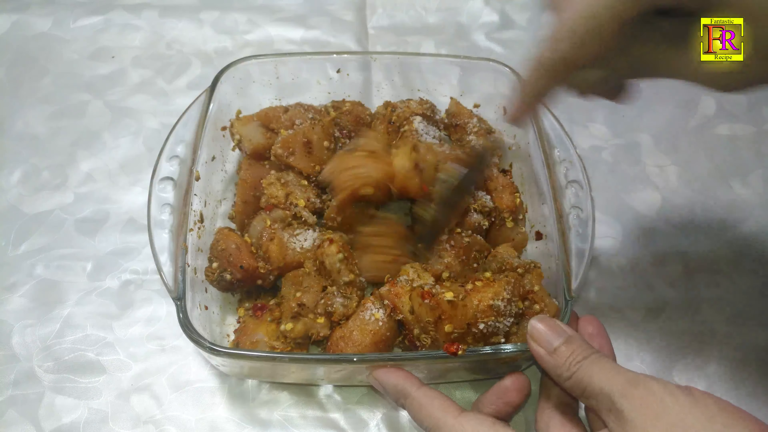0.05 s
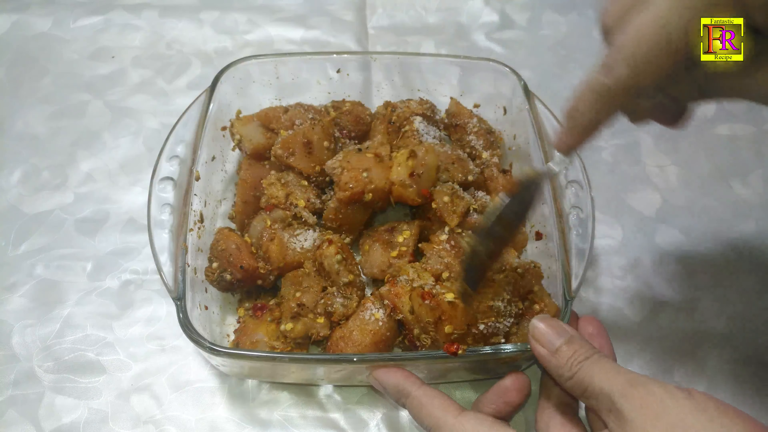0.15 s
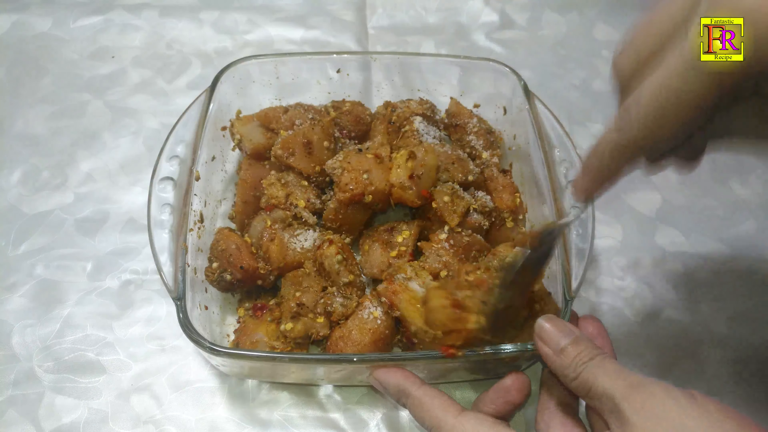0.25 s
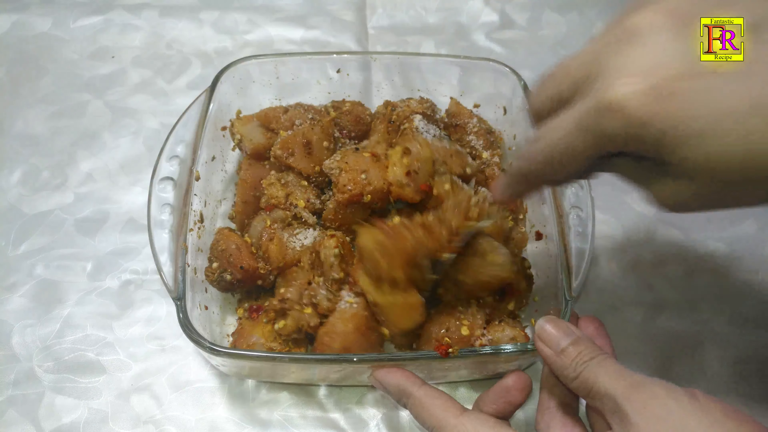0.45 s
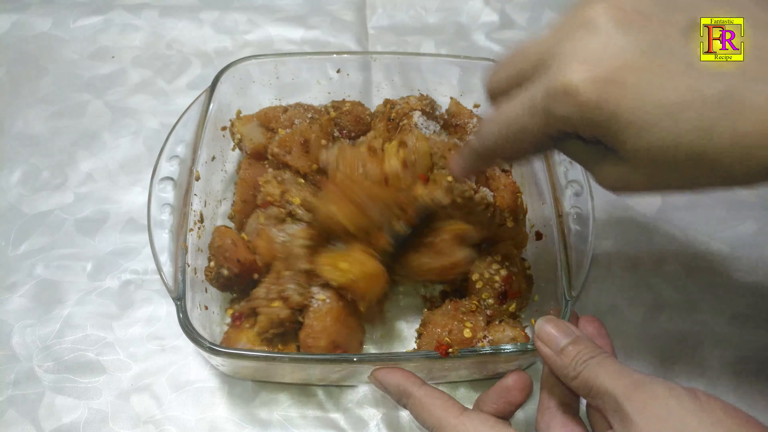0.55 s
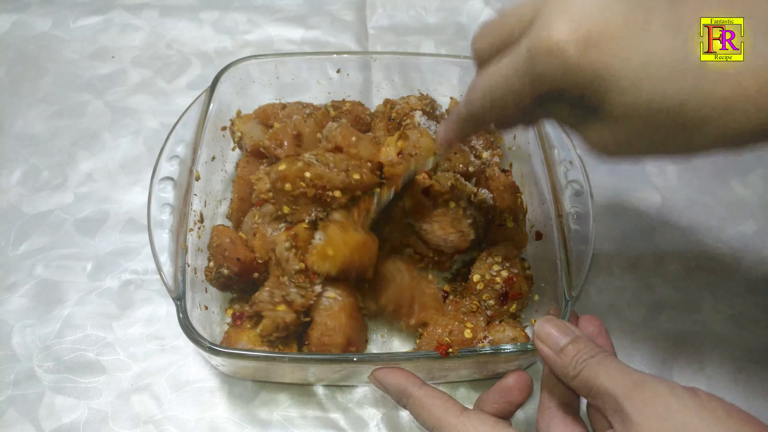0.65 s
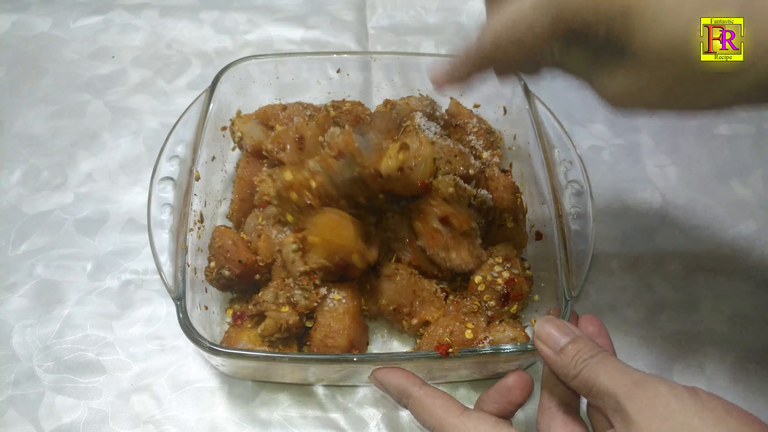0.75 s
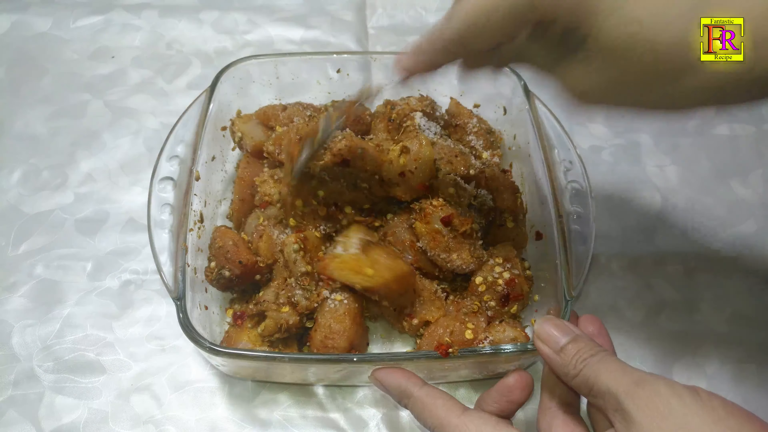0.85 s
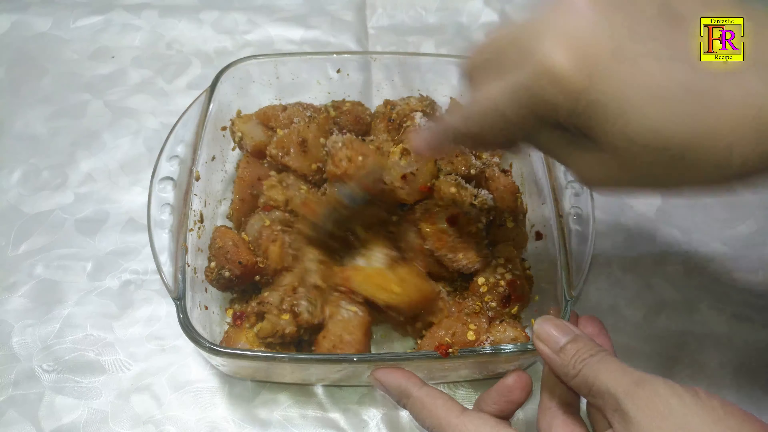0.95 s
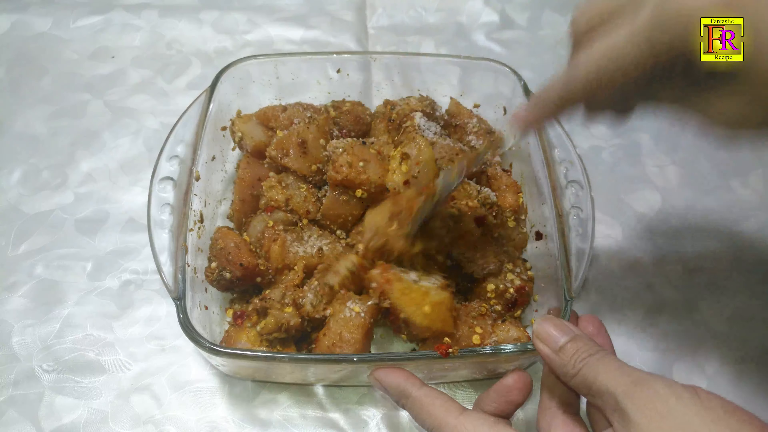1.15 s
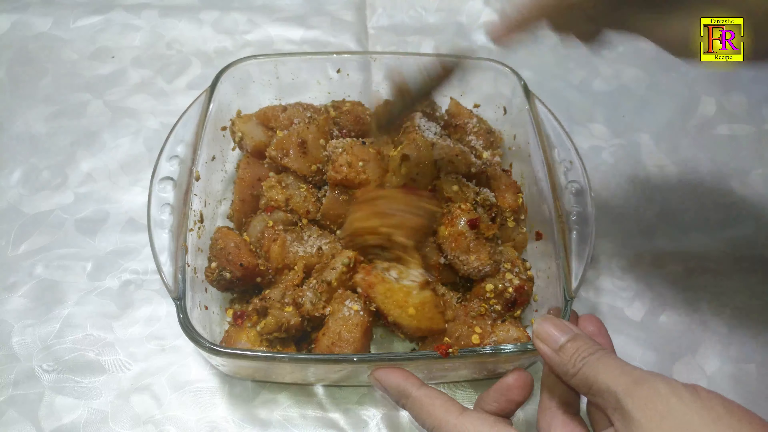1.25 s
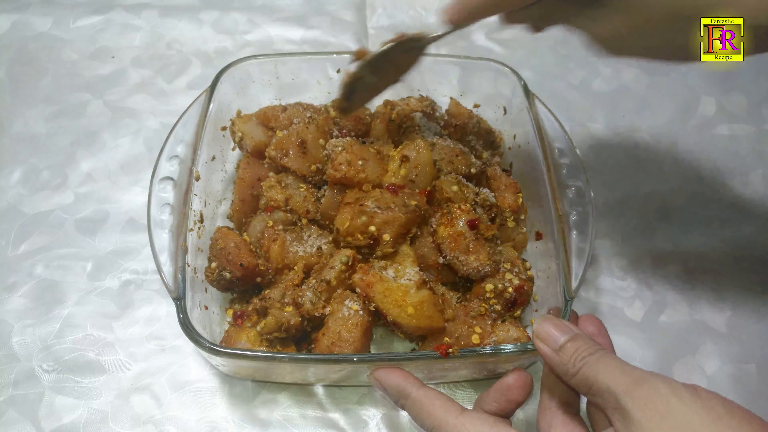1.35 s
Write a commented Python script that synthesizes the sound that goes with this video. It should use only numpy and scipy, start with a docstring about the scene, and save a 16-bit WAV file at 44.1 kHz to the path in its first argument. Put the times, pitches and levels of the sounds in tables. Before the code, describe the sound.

A metal spoon clinks on a glass baking dish: an earlier clink's tail fades at the start, then one loud, bright, rapidly chattering hit at 0.2 seconds, with short kitchen reverberation. The dish faintly rubs and groans on the counter near 0.7 and 1.2-1.4, with a tiny spoon tick around 0.9. An insect outside chirps about seven times a second over quiet room air and low hum. Close stereo microphone.

```python
"""A hard-walled kitchen: a metal spoon clinks once on a glass baking dish while an earlier clink dies away.
Each clink is a chatter of contacts, every one ringing damped modes and snapping with a burst of noise.
The dish grumbles on the counter as random slips shake resonances, with sine groans and light spoon ticks.
Outside, an insect chirps in gliding pulses and rasping noise; shaped noise makes the room air and a low hum.
A two-port microphone hears the clinks left first, the sliding dish and the insect right first."""
import sys
import numpy as np
from scipy import signal
from scipy.fft import rfft, irfft, next_fast_len
from scipy.io import wavfile
from scipy.ndimage import uniform_filter1d, map_coordinates

SR = 44100
rng = np.random.default_rng(int(sys.argv[2]) if len(sys.argv) > 2 else 0)


def generate_wav(sig):
    """Save sig (samples, or channels by samples) to the path in sys.argv[1] as 16-bit PCM at SR."""
    pcm = np.round(np.clip(np.atleast_2d(sig).T, -1, 1) * 32767).astype(np.int16)
    wavfile.write(sys.argv[1], SR, pcm)


def boost(x):
    """Linear amplitude factor 10**(x/20) for a level x in decibels (scalar or array-like)."""
    u = np.asarray(x, float) / 20
    return 10 ** u


N = 61739
PAD = SR // 2  # samples kept before and after the take, so the earlier clink can ring in
LEFT_LAG_S = 0.00019  # the left port hears the insect, the sliding dish and the air this much later


def filtered(x, response):
    """Multiplies the spectrum of x by a complex response of frequency."""
    size = next_fast_len(x.shape[-1] + SR // 4)
    hz = np.fft.rfftfreq(size, 1 / SR)
    return irfft(rfft(x, size) * response(hz), size)[..., :x.shape[-1]]


def unit(x):
    """Scales a signal to rms 1."""
    return x / np.sqrt(np.mean(x ** 2) + 1e-30)


def along(points, hz):
    """Reads a curve of (frequency [Hz], value) points on a log frequency axis."""
    point_hz, value = np.transpose(points)
    return np.interp(np.log(hz + 1), np.log(point_hz + 1), value)


def curve(rows):
    """Joins (time [s], value) rows by straight lines, one value per sample."""
    return np.interp(np.arange(N) / SR, *np.transpose(rows))


def wobble(rate):
    """A smooth random curve with rate knots a second."""
    return map_coordinates(rng.standard_normal(200), [np.arange(N) * rate / SR])


def shaped_noise(shape, spectrum):
    """Noise of rms 1 coloured by (frequency [Hz], level [dB per Hz]) points."""
    noise = rng.standard_normal(shape)
    return unit(filtered(noise, lambda hz: boost(along(spectrum, hz))))


def spread(pair, alike):
    """Mixes two unrelated signals to a left-right likeness that varies with frequency."""
    def mid_side(hz):
        turn = np.arccos(np.clip(along(alike, hz), -1, 1)) / 2
        return np.array([np.cos(turn), np.sin(turn)])

    mid, side = filtered(pair, mid_side)
    return np.array([mid + side, mid - side])


def at_ports(x, lag_s=LEFT_LAG_S, balance=((1000, -1.5),)):
    """A source off to one side reaches the ports at unequal times and levels (left over right, dB)."""
    def half(hz):
        return boost(along(balance, hz) / 2) * np.exp(-1j * np.pi * hz * lag_s)

    return filtered(x, lambda hz: np.array([half(hz), 1 / half(hz)]))


def ring(modes, t):
    """Sums damped modes of alternating sign, with slightly new strengths at each blow."""
    out = 0
    for k, (hz, db, t60) in enumerate(modes):
        decay = boost(db + rng.normal(0, 1) - 60 * t / t60)
        out = out + (-1) ** k * decay * np.sin(2 * np.pi * hz * t)
    return out


def room(x):
    """Kitchen walls answer with decaying noise; the rooms beyond answer longer and duller."""
    # kitchen reverberation: (frequency [Hz], decay by 60 dB [s])
    kitchen = [(150, 1), (500, 0.2994), (1500, 0.41), (4000, 0.36), (8000, 0.42), (14000, 0.3)]
    # likeness of the tail at the two ports: (frequency [Hz], correlation [-1 to 1])
    tail_alike = [(100, 0.46), (300, .8), (700, .5), (1500, 0.13), (5000, 0.034)]
    delay_s = 0.0044  # silent this long, then fades in over as long again
    beyond_db, beyond_t60_s, beyond_top_hz = -32.5, 1.08, 2740
    hz, t, z = signal.stft(rng.standard_normal((2, SR)), SR, nperseg=256)
    decay = boost(-60 * t / along(kitchen, hz)[:, None])
    near = signal.istft(z * decay, SR, nperseg=256)[1][:, :SR]
    t = np.arange(SR) / SR
    near = near * np.clip(t / delay_s - 1, 0, 1)
    far = rng.standard_normal((2, SR)) * boost(-60 * t / beyond_t60_s) * np.clip(t / 0.021, 0, 1)
    far = filtered(far, lambda hz: 1 / (1 + (hz / beyond_top_hz) ** 4))
    tail = near / np.linalg.norm(near[0]) + boost(beyond_db) * far / np.linalg.norm(far[0])
    return signal.fftconvolve(x[None], spread(tail, tail_alike), axes=1)[:, :len(x)]


def air():
    """Room noise, patchy in time and frequency, over a narrow noise band that hums and wavers."""
    # colour of the room noise: (frequency [Hz], level [dB per Hz])
    air_colour = [(15, -46), (30, -30), (86, -9), (233, -13), (445, -14.5), (1170, -21), (3260, -22.5),
                  (4260, -32.5), (7100, -38.5), (9500, -46), (15500, -54.5)]
    # likeness of the room noise at the two ports: (frequency [Hz], correlation [-1 to 1])
    air_alike = [(60, 0.36), (300, 0.29), (1000, 0.2), (5000, 1)]
    air_db, hum_db = -73, -75.5
    hum_hz, hum_width_hz = 96, 17
    z = signal.stft(rng.standard_normal((2, N)), nperseg=512)[2]
    patches = uniform_filter1d(rng.standard_normal(z.shape[1:]), size=6, axis=0)
    patches = uniform_filter1d(patches, size=8, axis=1)
    pair = signal.istft(z * boost(2 * unit(patches)), nperseg=512)[1][:, :N]
    coloured = filtered(pair, lambda hz: boost(along(air_colour, hz)))
    hiss = unit(spread(coloured, air_alike))
    sides = np.array([[1], [-1]])  # left later, right earlier
    hiss = filtered(hiss, lambda hz: np.exp(-1j * np.pi * hz * LEFT_LAG_S * sides))
    hum = filtered(rng.standard_normal(N), lambda hz: 1 / (1 + ((hz - hum_hz) / hum_width_hz) ** 2))
    return boost(air_db + 0.83 * wobble(12)) * hiss + boost(hum_db) * unit(hum)


def insect():
    """Each chirp is two falling wing pulses and a dying rasp, smeared by walls, over a far chorus."""
    # chirps heard outside, the faint one at 1.271 s perhaps from another insect: (time [s], level [dB])
    chirps = [(0.048, -60), (0.192, -59.5), (0.359, -60.5), (0.5053, -62.5), (0.6473, -62), (0.7874, -63),
              (0.926, -58), (1.067, -58.5), (1.209, -62.5), (1.271, -68), (1.3483, -60)]
    # colour of the rasp after the pulses: (frequency [Hz], level [dB per Hz])
    rasp_colour = [(4300, -39), (4800, -17.5), (5200, -4.5), (5900, 4), (6300, -4.5), (7000, -16.5),
                   (9300, -26), (10000, -47.5)]
    # colour of the far insects: (frequency [Hz], level [dB per Hz])
    chorus_colour = [(2530, -58), (4300, -26.5), (4700, -22), (4960, -7.5), (5210, -4.5), (5850, -3),
                     (6090, -7), (7000, -19.5), (9500, -25.5), (12400, -66), (20900, -120)]
    pulse_s, glide_from_hz, glide_to_hz = .01, 6200, 4898
    lead_s, lead_db = .0238, 0.5  # the first pulse comes this much ahead of the second
    rasp_db, rasp_rise_s, rasp_t60_s = -4, 0.009, .35
    walls_t60_s, chorus_db = 0.42, -79.5

    u = np.arange(round(pulse_s * SR)) / (pulse_s * SR)
    glide_hz = glide_from_hz + (glide_to_hz - glide_from_hz) * u
    pulse = np.sin(np.pi * u) * (0.14 + u) * np.sin(2 * np.pi * np.cumsum(glide_hz) / SR)
    t = np.arange(SR // 4) / SR
    rasp_shape = boost(-60 * t / rasp_t60_s) * (1 - np.exp(-t / rasp_rise_s))
    pulses, rasp_level = np.zeros(N + SR), np.zeros(N + SR)
    for s, db in chirps:
        for at, pulse_db in ((s - lead_s, lead_db), (s, 0)):
            start = round((at - pulse_s / 2) * SR)
            pulses[start:][:len(u)] += boost(db + pulse_db + rng.normal(0, 1)) * pulse
        rasp_level[round(s * SR):][:len(t)] += boost(db + rasp_db) * rasp_shape

    t = np.arange(SR // 2) / SR
    walls = rng.standard_normal((2, len(t))) * boost(-60 * t / walls_t60_s) * np.clip(t / 0.0087, 0, 1)
    echo = signal.fftconvolve(pulses[None], walls / np.linalg.norm(walls[0]), axes=1)[:, :N]
    rasp_level = rasp_level[:N]
    rasp = shaped_noise((3, N), rasp_colour)  # one direct, two diffuse
    chorus = shaped_noise((3, N), chorus_colour)[1:]
    direct = at_ports(pulses[:N] + rasp_level * rasp[0])
    diffuse = 1.1 * rasp_level * rasp[1:]
    return direct + diffuse + echo + boost(chorus_db + 1.5 * wobble(7.6)) * chorus


def drag():
    """Uneven slips shake the counter's resonances; the dish groans as it sticks, and the spoon ticks."""
    # effort of dragging the dish on the counter: (time [s], level [dB])
    effort = [(0, -74.5), (.1, -76.5), (.19, -73), (.5, -84.5), (.64, -80), (.74, -62.5), (.82, -82.5),
              (.94, -74.5), (1.02, -80.5), (1.15, -84), (1.24, -72.5), (1.32, -70), (1.4, -70.5)]
    # resonances of the counter: (frequency [Hz], width [Hz], level [dB])
    counter = [(387, 36, -2), (529.6, 50, -5.5), (738, 120, -11), (1577, 75, -13.5), (1820, 73, -9.5),
               (2220, 100, -11.5)]
    # light spoon ticks in the marinade: (time [s], level [dB], frequency [Hz])
    ticks = [(0.887, -60.5, 1734), (1.065, -66.5, 308.4)]
    # the dish sticks and groans: (centre time [s], level [dB], frequency [Hz])
    groans = [(0.714, -64, 470), (.738, -57.5, 422), (0.773, -64, 404.6), (.79, -63.5, 512.6),
              (.86, -67.5, 493), (1.24, -62, 411), (1.284, -64.5, 394), (1.318, -54.5, 400.5),
              (1.343, -56.5, 381), (1.388, -60, 410.5)]
    slips_per_s, slip_spread_db, soft_hz = 270, 5, 2460
    tick_t60_s, groan_s = .06, 0.025

    def body(f):
        out = 0
        for k, (centre, width, db) in enumerate(counter):
            resonance = 1j * f * width / (centre * centre - f * f + 1j * f * width)
            out = out + (-1) ** k * boost(db) * resonance
        return out / (1 + 1j * f / soft_hz) ** 2

    slips = (rng.random(N) < slips_per_s / SR) * boost(slip_spread_db * rng.standard_normal(N))
    rub = 0.052 * rng.standard_normal(N)
    x = unit(filtered(slips + rub, body)) * boost(curve(effort))
    t = np.arange(SR // 10) / SR
    for s, db, hz in ticks:
        x[round(s * SR):][:len(t)] += ring([(hz, db, tick_t60_s)], t) * (1 - np.exp(-t / 0.00084))
    u = np.arange(round(groan_s * SR)) / (groan_s * SR)
    x = np.pad(x, (0, len(u)))
    for s, db, hz in groans:
        tone = np.sin(2 * np.pi * (hz * groan_s * u + rng.random()))
        x[round((s - groan_s / 2) * SR):][:len(u)] += boost(db) * np.sin(np.pi * u) ** 2 * tone
    x = x[:N]
    return at_ports(x) + boost(-7) * room(x)


def clinks():
    """Each contact of the chattering spoon rings the dish and snaps; the counter hums after."""
    # spoon on glass, the first before the start: (time [s], level [dB])
    strikes = [(-.33, 0.5), (0.2163, -1)]
    # the spoon edge chatters on the glass: (delay [s], level [dB])
    chatter = [(0, 2), (.0021, -5.5), (.0045, -7), (.0068, -4), (.0088, -10.5)]
    # glass and spoon, damped by meat and fingers: (frequency [Hz], level [dB], decay by 60 dB [s])
    dish = [(184.4, -28, 0.12), (265, -28, 0.041), (376, -31.5, 0.093), (470, -32, 0.11),
            (542.2, -21.5, 0.035), (1072, -12.5, 0.036), (1138.5, -11, 0.045), (1242.7, -13, 0.26),
            (1359, -13, .025), (1652.5, -7.5, 0.034), (1863, -8.5, 0.027), (1981, -17, .15),
            (2199, -10.5, 0.027), (2963, -34, 0.046), (3270, 3.5, 0.019), (3363, -22, .08),
            (3576, -16.5, 0.055), (4149.6, -7.5, 0.11), (4808, -10.5, .04), (5325, -26, 0.045),
            (6120, -17.5, 0.031), (6705, -26.5, 0.049), (6766, -36, 0.043), (7900, -28, .015),
            (8500, -18.5, 0.005), (9500, -41, 0.0042), (10900, -40.5, 0.022), (13300, -37.5, .01),
            (14100, -42, 0.014)]
    # colour of the broadband snap of contact: (frequency [Hz], level [dB per Hz])
    snap_colour = [(71, -77.5), (120, -28.5), (1350, -10.5), (2590, -7), (3300, -9.5), (5270, -20.5),
                   (6080, -17), (8770, -51), (15500, -65)]
    # the counter under the dish hums as a beating pair: (frequency [Hz], level [dB], decay by 60 dB [s])
    boom = [(314.5, -25.5, 0.28), (328.8, -31, .26)]
    # balance of the clinks between the ports: (frequency [Hz], left over right [dB])
    dish_balance = [(300, -5), (1400, -7.5), (2600, -3.5), (3800, -10), (6000, 13.5), (13000, 4.5)]
    snap_db, snap_t60_s, attack_s = -1.5, 0.015, .0006
    boom_rise_s, low_cut_hz, kitchen_db = 0.034, 120, -5
    dish_left_lag_s = -0.00011  # negative: the left port hears the clinks first

    t = np.arange(PAD) / SR
    out = 0
    for s, db in strikes:
        x = np.zeros(N + 2 * PAD)
        for delay, hit_db in chatter:
            snap = boost(snap_db - 60 * t / snap_t60_s) * shaped_noise(PAD, snap_colour)
            blow = (ring(dish, t) + snap) * (1 - np.exp(-t / attack_s))
            x[PAD + round((s + delay) * SR):][:PAD] += boost(db + hit_db - 8) * blow
        x = filtered(x, lambda hz: (1j * hz / (low_cut_hz + 1j * hz)) ** 4)
        both = at_ports(x, dish_left_lag_s, dish_balance) + boost(kitchen_db) * room(x)
        hum = sum(boost(level - 60 * t / t60) * np.sin(2 * np.pi * hz * t) for hz, level, t60 in boom)
        hum = hum * (1 - np.exp(-(t / boom_rise_s) ** 2))
        both[:, PAD + round(s * SR):][:, :PAD] += boost(db) * hum
        out = out + both[:, PAD:PAD + N]
    return out


def scene():
    """Sums all sources at the two ports, the insect and air under a shared moving level."""
    # the quiet background swells and dips: (time [s], level [dB])
    swell = [(0, -0.5), (.15, -5), (.2, 1.5), (.6, -0.5), (.9, -2.5), (1.0, -2), (1.03, -6.5), (1.07, -1),
             (1.11, -5), (1.15, -17.5), (1.175, -6.5), (1.2, -1.5), (1.4, 0)]
    background = boost(curve(swell)) * (insect() + air())
    return background + drag() + clinks()


def low_pass(x):
    """Removes everything above the highest recorded frequency."""
    return signal.sosfilt(signal.butter(12, 15730, fs=SR, output="sos"), x)


def record(dry):
    """The microphone preamp overloads softly, bending peaks toward a ceiling."""
    ceiling, knee = .92, 4  # full scale = 1; a higher knee bends later and harder
    mix = dry / (1 + np.abs(dry / ceiling) ** knee) ** (1 / knee)
    return low_pass(mix)


dry = scene()
out = record(dry)
generate_wav(out)
```